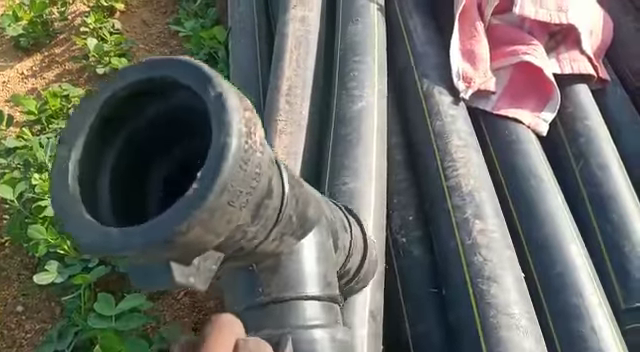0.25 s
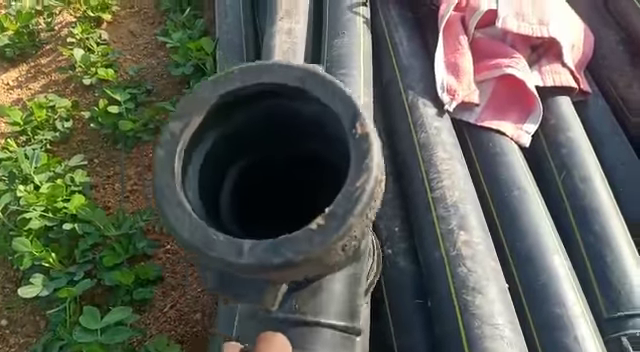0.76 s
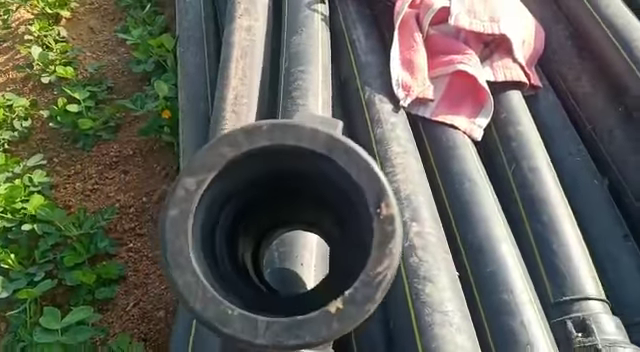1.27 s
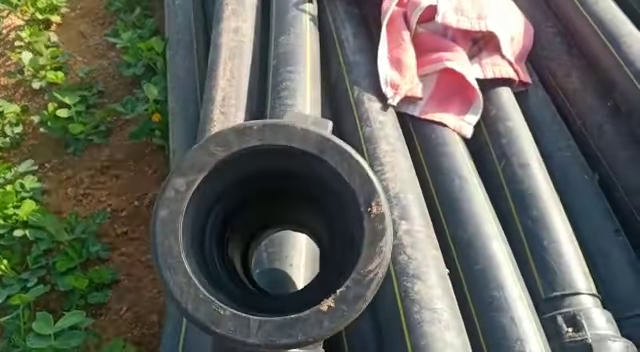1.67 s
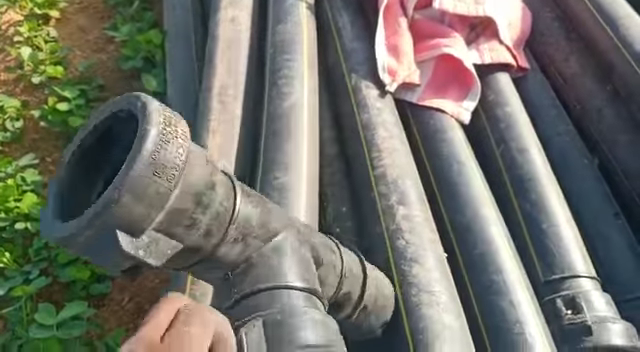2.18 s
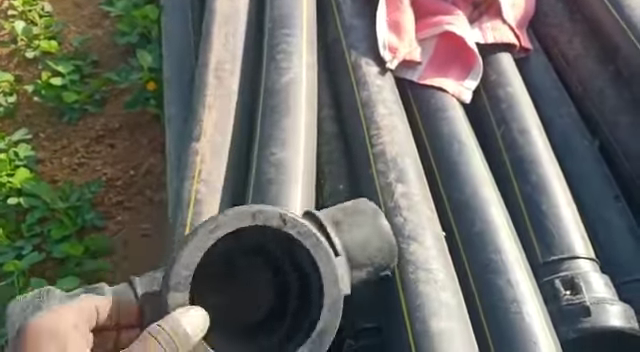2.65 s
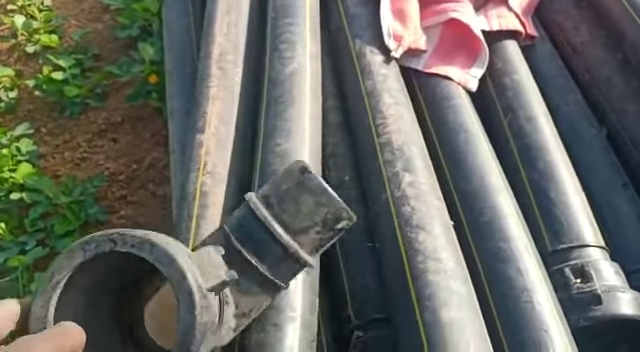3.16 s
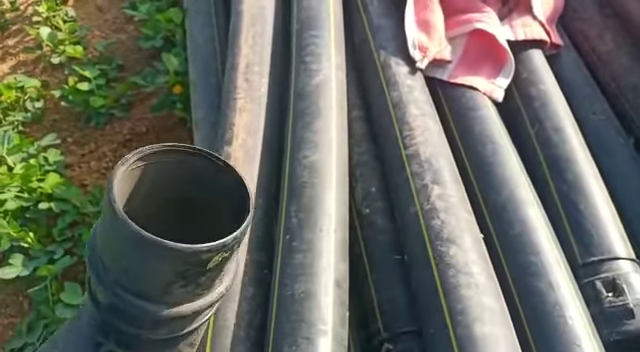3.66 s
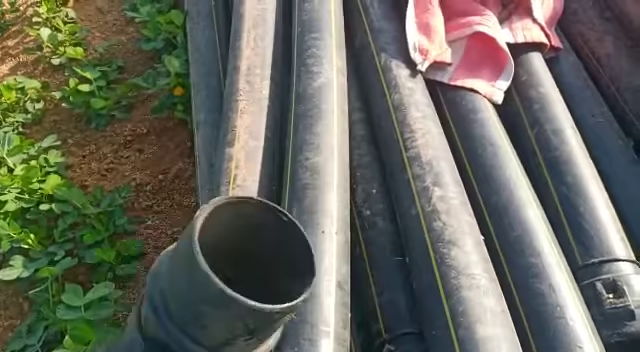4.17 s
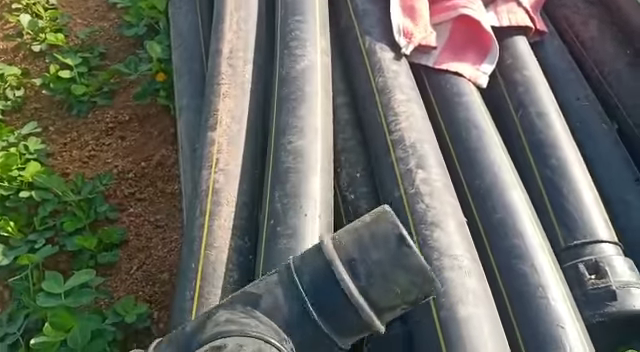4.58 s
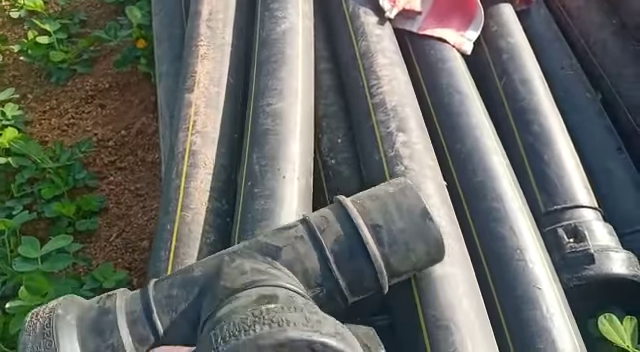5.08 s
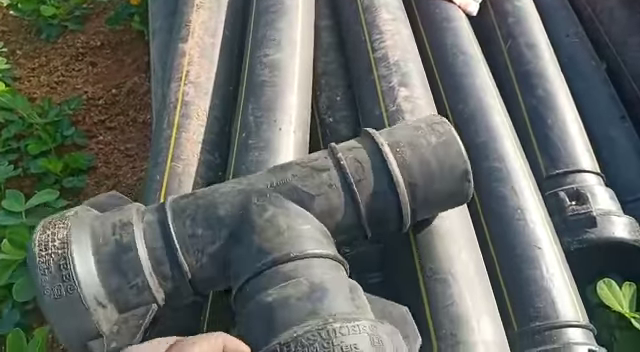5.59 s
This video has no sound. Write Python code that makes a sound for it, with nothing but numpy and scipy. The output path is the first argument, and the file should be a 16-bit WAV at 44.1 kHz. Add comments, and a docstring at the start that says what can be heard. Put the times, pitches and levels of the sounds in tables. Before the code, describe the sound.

Outdoor plastic handling, heard near one microphone: low grip thuds, tiny gritty ticks and small bright bird chips, then a quick swelling brush leads into hollow knocks. Rough drags and a short wobbling squeal come midway, a quiet spell follows, and firm clacks with scraping end it. The pipes answer each hit with a short, dull, fluttering echo, over soft air hiss and slight wind buffeting.

```python
"""Tee fitting on plastic pipes

Open field, no walls near, one microphone: a hard plastic tee is turned over on a pile of long plastic pipes.
It knocks, scrapes and squeals on them: modes of the fitting ring, and echoes flutter in the air of the pipes.
Shaped noise makes the drags, grit, air and wind; short low pulses make the soft handling bumps.
Small birds, some of them far off, chip and whistle as gliding sines."""
import sys
import numpy as np
from scipy import signal
from scipy.fft import rfft, irfft
from scipy.io import wavfile
from scipy.ndimage import uniform_filter1d

SR = 44100
rng = np.random.default_rng(int(sys.argv[2]) if len(sys.argv) > 2 else 0)


def log_audio(samples):
    """Write samples as a 16-bit WAV file to the path given in sys.argv[1]."""
    # one column per channel
    frames = np.atleast_2d(samples).T
    # limit to full scale, then quantise
    limited = np.clip(frames, -1, 1)
    pcm = np.round(limited * 32767).astype(np.int16)
    wavfile.write(sys.argv[1], SR, pcm)


N = 257323
TIME = np.arange(N) / SR
FREQS = np.fft.rfftfreq(N, 1 / SR) + 1e-3  # just above zero, so that the logarithm exists


def undb(db):
    """Decibels to gain."""
    return 10 ** (np.asarray(db) / 20)


def unit(x):
    """Scale to rms 1."""
    return x / np.sqrt(np.mean(x ** 2))


def band(x, lo_hz, hi_hz, order=2):
    """Causal band-pass."""
    sos = signal.butter(order, [lo_hz, min(hi_hz, .45 * SR)], "band", fs=SR, output="sos")
    return signal.sosfilt(sos, x)


def colour(x, points):
    """Filter x by (f/Hz, level/dB) points, joined along log frequency."""
    hz, db = np.transpose(points)
    gain = undb(np.interp(np.log(FREQS), np.log(hz), db))
    return irfft(rfft(x) * gain, N)


def envelope(s, length_s, attack_s, release_s, sag_db):
    """Attack, a hold that sags, release."""
    t = TIME - s
    attack = np.clip(t / attack_s, 0, 1)
    sag = undb(-sag_db * np.clip(t / length_s, 0, 1))
    release = np.exp(-np.maximum(t - length_s, 0) / release_s)
    return attack * sag * release


def walk(rate):
    """Smooth random wander of rms 1, with `rate` new values a second."""
    k = int(SR / rate)
    steps = np.repeat(rng.standard_normal(N // k + 1), k)
    return unit(uniform_filter1d(steps, k)[:N])


def add(out, s, x):
    """Mix x into out from time s on."""
    i = max(int(s * SR), 0)
    out[i:i + len(x)] += x[:max(N - i, 0)]


def fade(t, t60):
    """Exponential decay by 60 dB in t60 seconds."""
    return undb(-60 * t / t60)


def grit(spread_db):
    """Dense tiny slips of uneven size, bunched by the unsteady hand."""
    size_db = spread_db * walk(1500) + 2.3 * walk(110)
    return rng.standard_normal(N) * undb(size_db)


# spectrum of the outdoor air, relative: f/Hz, level/dB (per Hz)
AIR = [(25, -25.5), (50, -13), (80, -6), (130, -11), (230, -15.5), (420, -18), (750, -24), (1900, -26.5),
       (3400, -25.5), (4300, -33.5), (5200, -46), (6500, -54.5), (8000, -58), (15000, -60.5)]
# low wind on the microphone, relative: t/s, level/dB
WIND = [(0, -45.5), (.3, -38), (.5, -50), (.95, -41), (1.6, -55.5), (2.2, -44), (2.55, -49.5), (3.68, -57),
        (4.27, -45), (5.1, -52), (5.83, -48)]
AIR_DB = -54.5  # mean level from 300 to 15000 Hz


def field():
    """Even outdoor hiss, with a little wind buffeting the microphone."""
    air = colour(rng.standard_normal(N), AIR)
    air = air / np.std(band(air, 300, 15000)) * undb(AIR_DB + .7 * walk(6))
    wind_db = np.interp(TIME, *np.transpose(WIND)) + 1.7 * walk(11)
    wind = unit(band(rng.standard_normal(N), 49.5, 147.0, order=3)) * undb(wind_db)
    return air + undb(-4) * wind


# short bird chips: t/s, middle f/Hz, sweep/octaves, relative level/dB
CHIPS = [(.15, 3130, -.27, -55), (.163, 5240, -.15, -61.5), (.205, 5160, -0.25, -61),
         (.721, 3470, -0.28, -56), (.93, 3510, -0.4, -49.5), (1.194, 3460, -0.24, -44),
         (1.296, 3580, -.32, -50.5), (1.338, 5300, -.15, -71), (1.472, 3650, 0.29, -58),
         (1.495, 3540, -0.33, -44), (1.565, 3550, -0.35, -47), (1.59, 2650, -0.1, -50.5),
         (4.595, 5450, -.1, -67), (4.635, 5400, -.12, -71)]
# thin bird whistles: t/s, length/s, start f/Hz, glide/octaves, relative level/dB
WHISTLES = [(.77, 0.048, 4500, -0.042, -63), (.85, .09, 3790, -0.29, -55.5),
            (0.982, 0.091, 4300, -0.13, -59.5), (1.08, .1, 3550, 0.0031, -61),
            (1.25, 0.077, 4240, .03, -61), (1.49, 0.08, 4960, .18, -74), (1.997, .33, 4860, 0.34, -67),
            (4.147, .69, 3330, 0.0059, -64), (4.655, 0.1, 4850, 0.24, -68), (5.05, 0.038, 4580, 0.062, -68),
            (5.357, .1, 4950, .14, -63)]
CHIP_S = 0.0291
WHISTLE_BEND = 2.6  # the glide gathers pace as this power of time
TWITTER_S, TWITTER_DB = (.68, 1.65), -64  # span and middle relative level of the far flock


def birds():
    """Small birds chip and whistle; for a while more twitter far off; the plants scatter their calls."""
    out, waver = np.zeros(N), walk(150)

    def note(s, length_s, hz, octaves, bend, db):
        """A gliding, slightly wavering sine that swells and fades."""
        u = np.linspace(0, 1, int(length_s * SR))
        wavering = 1 + 0.0046 * np.roll(waver, -int(s * SR))[:len(u)]
        pitch = hz * 2 ** (octaves * u ** bend) * wavering
        return undb(db) * np.sin(np.pi * u) * np.sin(2 * np.pi * np.cumsum(pitch) / SR)

    far = []
    for when, high, sweep in rng.random((30, 3)):
        s = np.interp(when, [0, 1], TWITTER_S)
        # the higher a far chip, the fainter it arrives
        far.append((s, 2900 + 2400 * high, 0.69 * (sweep - .55), TWITTER_DB + 18 * (.5 - high)))
    for s, hz, octaves, db in [*CHIPS, *far]:
        start_hz = hz * 2 ** (-octaves / 2)
        add(out, s, note(s, CHIP_S, start_hz, octaves, 0.98, db))
    for s, length, hz, octaves, db in WHISTLES:
        add(out, s, note(s, length, hz, octaves, WHISTLE_BEND, db))
    out = out * undb(2.5 + 1.5 * walk(100))
    scatter = rng.standard_normal(SR // 2) * fade(np.arange(SR // 2) / SR, .4)
    scattered = signal.fftconvolve(out, scatter / np.linalg.norm(scatter))[:N]
    return out + undb(-15.0) * scattered


# soft handling bumps at the microphone: t/s, peak level/dB, f/Hz
BUMPS = [(0.367, -22, 107), (0.427, -22, 123), (0.813, -18.5, 104), (0.96, -27.5, 113), (0.993, -27.5, 109),
         (1.091, -36.5, 90), (2.253, -28.5, 111), (3.974, -33, 84), (4.4, -34, 77)]


def bumps(width_s=0.0053):
    """The hand shifts its grip: soft thuds of about two cycles."""
    out = np.zeros(N)
    for s, db, hz in BUMPS:
        t = TIME - s
        out += undb(db) * np.exp(-(t / width_s) ** 2) * np.cos(2 * np.pi * hz * t)
    return out


# the clearest ticks of grit and fingers on the plastic: t/s, relative level/dB
TICKS = [(.036, -48), (.052, -50), (.102, -46.5), (.289, -46), (.677, -53), (0.828, -50), (2.272, -49),
         (2.525, -37)]
# spectrum of the ticks and of the hard edge of the knocks: f/Hz, level/dB
TICK_COLOUR = [(500, -9), (2000, 1), (3800, 5.5), (5300, -4.5), (7000, -11.5), (9000, -22), (12000, -24.5),
               (15000, -49)]


def ticks():
    """Grit snaps between hand and plastic: quickly fading noise."""
    t = np.arange(SR // 20) / SR
    out = np.zeros(N)
    for s, db in TICKS:
        add(out, s, undb(db + 7.0) * rng.standard_normal(len(t)) * fade(t, 0.017))
    return colour(out, TICK_COLOUR)


# spectrum of the brushing slide and of the scratches, relative: f/Hz, level/dB (per Hz)
BRUSH_COLOUR = [(200, -16), (450, -3.5), (900, -6), (1900, -5), (3000, 0.5), (3400, -6.5), (4000, 3),
                (5300, -22), (6700, -24), (8500, -36), (11400, -30), (15000, -59)]
BRUSH_FULL_S, BRUSH_HOLD_S, BRUSH_DB = 1.892, 0.039, -34.5  # time of full level, its hold, the level
BRUSH_SWELL_DB_PER_S, BRUSH_STOP_DB_PER_S = 250, 1200


def brush():
    """A light, bright slide that gathers speed, heard as a swell, and stops short."""
    t = TIME - BRUSH_FULL_S
    swell_db = BRUSH_SWELL_DB_PER_S * np.minimum(t, 0)
    stop_db = -BRUSH_STOP_DB_PER_S * np.maximum(t - BRUSH_HOLD_S, 0)
    return unit(colour(grit(2.6), BRUSH_COLOUR)) * undb(BRUSH_DB + swell_db + stop_db)


# scratches where grit catches: t/s, level/dB (before the sag)
SCRATCHES = [(2.363, -46), (2.522, -40), (2.545, -47), (2.583, -40), (2.618, -41), (2.66, -50), (3.17, -48)]
SCRATCH_S = .014


def scratches():
    """Short bright bursts of gritty noise where grit catches."""
    gain = sum(undb(db) * envelope(s, SCRATCH_S, .004, 0.0069, 2.5) for s, db in SCRATCHES)
    return unit(colour(grit(3.2), BRUSH_COLOUR)) * gain


# reedy squeals, pitches before the wobble:
# t/s, length/s, start f/Hz, end f/Hz, brightest f/Hz at start, brightest f/Hz at end, relative level/dB
SQUEALS = [(2.733, .022, 1160, 1244, 2450, 2400, -32.5), (2.9, .155, 1127, 965, 3470, 2000, -39)]
SQUEAL_ATTACK_S, SQUEAL_SAG_DB, SQUEAL_WOBBLE_HZ, SQUEAL_WOBBLE = 0.0033, 10, 11, .033


def squeals(width_hz=600, rough=0.0117):
    """Two reedy squeals start sharply and wobble; a sinking resonance picks out their harmonics."""
    out = np.zeros(N)
    for s, length, start_hz, end_hz, bright_start_hz, bright_end_hz, db in SQUEALS:
        u = np.clip((TIME - s) / length, 0, 1)
        wobble = 1 + SQUEAL_WOBBLE * np.cos(2 * np.pi * SQUEAL_WOBBLE_HZ * (TIME - s))
        hz = (start_hz + (end_hz - start_hz) * u) * wobble
        bright_hz = bright_start_hz + (bright_end_hz - bright_start_hz) * np.sin(np.pi / 2 * u ** 2)
        phase = 2 * np.pi * np.cumsum(hz * (1 + rough * walk(1200))) / SR
        reed = np.zeros(N)
        for k in range(2, 5):
            reed += np.sin(k * phase) / np.hypot(1, 2 * (k * hz - bright_hz) / width_hz)
        out += undb(db) * reed * envelope(s, length, SQUEAL_ATTACK_S, .008, SQUEAL_SAG_DB)
    return out * undb(2 * walk(230))


# drags of the fitting over the pipes, levels at the start of the drag:
# t/s, length/s, hollow rumble level/dB, gritty hiss level/dB, easing over the drag/dB
DRAGS = [(0.274, 0.14, -43, -49, -0.5), (2.345, 0.19, -39, -40, 10), (2.513, 0.056, -38, -41, 5),
         (2.596, 0.19, -40.5, -40.5, 10.5), (3.082, .13, -41, -44.5, 0), (3.251, 0.22, -56, -53, -1),
         (3.55, 0.034, -56, -55.5, 0), (4.268, 0.15, -78, -60.5, -2), (4.584, 0.26, -48, -54, 0),
         (5.175, 0.3, -49.5, -46.5, 4), (5.497, 0.28, -47, -48.5, 0)]
# spectrum of the rubbing beneath the resonances, relative: f/Hz, level/dB (per Hz)
DRAG_COLOUR = [(200, -4), (330, 10), (540, 6), (720, 1.5), (1100, -7), (1500, 1.5), (2300, -2), (2800, -2),
               (4200, -2.5), (5300, -18), (6700, -23.5), (8300, -30.5), (11500, -31.5), (15000, -56)]
DRAG_ATTACK_S, DRAG_RELEASE_S = 0.018, 0.026


def scrapes(ring_db=8, ring_width_hz=65, unsteady_db=1.6):
    """Dusty plastic slides on plastic and stirs the fitting's modes; each drag grips, eases and lets go."""
    peaks = sum(undb(db) / (1 + (2 * (FREQS - hz) / ring_width_hz) ** 2) for hz, db, _ in MODES)
    resonance = 1 + undb(ring_db) * peaks
    rub = colour(irfft(rfft(grit(1.95)) * resonance, N), DRAG_COLOUR)
    rumble = unit(band(rub, 260, 900, order=3)) * undb(unsteady_db * walk(40))
    hiss = unit(band(rub, 1000, 19000, order=3))
    out = np.zeros(N)
    for s, length, rumble_db, hiss_db, ease_db in DRAGS:
        drag = undb(rumble_db) * rumble + undb(hiss_db) * hiss
        out += drag * envelope(s, length, DRAG_ATTACK_S, DRAG_RELEASE_S, ease_db)
    return out


# modes of the fitting, before the scatter of each strike: f/Hz, relative level/dB, t60/s
MODES = [(505.6, 0.5, 0.068), (601.4, -1.5, 0.047), (865, -8.5, 0.0069), (1001, -3.5, 0.052),
         (1217, -1, 0.042), (1343, -11, 0.063), (1532, -3, 0.018), (1916, -14.5, 0.051), (2344, 4.5, 0.036),
         (2755, -8.5, 0.048), (3122, -16, 0.14), (3675, -3, 0.0095), (3960, -15, 0.01), (4600, -16, 0.0073)]


def strike(t, clack_hz, pitch_db=3, pitch_t60=0.056, crack_db=6, crack_t60=0.0075, hold_s=0.0052,
           pile_db=-10, pile_t60=0.33):
    """One contact: the fitting's modes, weighted at random, a crack, and the duller rattle of the pile."""
    hz, db, t60 = np.vstack([MODES, (clack_hz, pitch_db, pitch_t60)]).T[:, :, None]
    # where the fitting is hit changes how strongly each mode rings
    size, detune, phase = rng.standard_normal((3, len(hz), 1))
    tones = np.sin(2 * np.pi * (hz * (1 + 0.007 * detune) * t + phase))
    ring = (undb(db + 2 * size) * fade(t, t60) * tones).sum(0)
    crack, pile = rng.standard_normal((2, len(t)))
    # the surfaces chatter for a few milliseconds before they part
    crack = unit(band(crack, 350, 5400)) * fade(np.maximum(t - hold_s, 0), crack_t60)
    pile = unit(band(pile, 276, 1070)) * fade(t, pile_t60)
    onset = 1 - np.exp(-t / 0.00015)
    return (ring + undb(crack_db) * crack + undb(pile_db) * pile) * onset


def pipe_echo(x, trip_s, loss_db, corner_hz, smear=0.72):
    """Sound runs along a pipe and back; open ends keep the lows and the yielding wall smears each round."""
    loss = abs(loss_db) * (1 + (FREQS / corner_hz) ** 3)  # dB a round, least for the lows
    phase = 2 * np.pi * FREQS * trip_s + smear * (FREQS / 150 - 1.55) ** 2
    trip = undb(-loss) * np.exp(-1j * phase)
    all_rounds = irfft(trip / (1 - trip), N)[:SR]
    return signal.fftconvolve(x, all_rounds)[:N]


# knocks, relative levels over the attack:
# t/s, wall clack level/dB, hollow body level/dB, pipe thump level/dB, hard edge level/dB, thump f/Hz, clack f/Hz
KNOCKS = [(.239, -29, -22.5, -36.5, -40, 323, 1060), (2.029, -23, -23, -30.5, -36.5, 171, 1220),
          (2.1557, -18.5, -21.5, -32, -29.5, 334, 1200), (2.252, -36.5, -31, -34.5, -49, 213, 810),
          (2.339, -23.5, -28, -34, -37.5, 278, 1610), (2.498, -31, -43, -38, -43, 280, 923),
          (3.0641, -25.5, -21, -22.5, -37.5, 244, 1078), (3.0941, -30, -32.5, -34, -36, 234, 965),
          (3.12, -34.5, -39, -32.5, -43.5, 240, 1025), (3.204, -31.5, -30, -28.5, -50, 224, 1270),
          (3.284, -43.5, -45, -34, -57, 238, 1410), (3.549, -37, -41, -39.5, -51, 218, 1084),
          (3.586, -45, -50, -53, -53, 221, 965), (3.709, -49, -49.5, -46, -64, 227, 950),
          (4.528, -20.5, -26, -25, -33, 287, 1470), (4.562, -28.5, -35, -31, -38, 298, 1060),
          (4.582, -35, -37, -39, -46, 279, 1023), (4.746, -30.5, -33, -38, -38, 243.2, 1030),
          (4.816, -29.5, -28.5, -30.5, -41.5, 266, 1434), (5.182, -26, -27, -34, -42, 248, 776),
          (5.201, -34.5, -28.5, -40.5, -49, 287, 790), (5.4595, -17, -20, -23.5, -32.5, 314, 1588),
          (5.791, -16, -23.5, -36, -26.5, 310, 1270), (5.8, -27.5, -20, -30, -45, 285, 1170)]
# the click against the clack, and the shares of body and clack that enter the pipes
CLICK_DB, BODY_LEAK_DB, CLACK_LEAK_DB = -8.5, -11, -20


def knocks():
    """Each knock clacks in the fitting and pushes a short thump into the pipes, where it echoes."""
    direct, into_pipe, edges = np.zeros((3, N))
    t = np.arange(SR // 4) / SR
    attack = SR // 50  # samples in 20 ms

    def level(x, db):
        """Set the rms level of the attack."""
        return x * undb(db) / np.sqrt(np.mean(x[:attack] ** 2))

    for s, clack_db, body_db, thump_db, edge_db, thump_hz, clack_hz in KNOCKS:
        hit = strike(t, clack_hz)
        # the pipe that is struck jostles its neighbours
        jostle = unit(band(rng.standard_normal(len(t)), 190, 480)) * fade(t, .1)
        tone = np.sin(2 * np.pi * thump_hz * t) * fade(t, .026)
        thump = level(band(tone + .12 * jostle, 140, 500), thump_db)
        body = level(band(hit, 347, 652, order=3), body_db)
        clack = level(band(hit, 804, 1650, order=3), clack_db)
        click = level(band(hit, 1890, 2850, order=4), clack_db + CLICK_DB)
        hard_click = level(band(hit, 2920, 4360, order=6), edge_db)
        add(direct, s, thump + body + clack + click + hard_click)
        add(edges, s, level(rng.standard_normal(len(t)) * fade(t, 0.026), edge_db))
        add(into_pipe, s, thump + undb(BODY_LEAK_DB) * body + undb(CLACK_LEAK_DB) * clack)
    long_pipe = pipe_echo(into_pipe, trip_s=.03475, loss_db=2.5, corner_hz=440)
    short_pipe = pipe_echo(into_pipe, trip_s=0.01324, loss_db=9.5, corner_hz=526)
    echoes = undb(-2.5) * long_pipe + undb(-3.5) * short_pipe
    return undb(-5.5) * direct + echoes + undb(-9.0) * colour(edges, TICK_COLOUR)


def scene():
    """Everything at one microphone, with no walls near."""
    surroundings = field() + birds()
    handling = bumps() + ticks()
    sliding = brush() + scratches() + squeals() + scrapes()
    return (surroundings + handling + sliding + knocks())[None]


def record(dry, top_hz=15500):
    """The recorder cuts the top with a steep low-pass."""
    return signal.sosfilt(signal.ellip(8, .2, 70, top_hz, fs=SR, output="sos"), dry)


dry = scene()
out = record(dry)
log_audio(out)
```